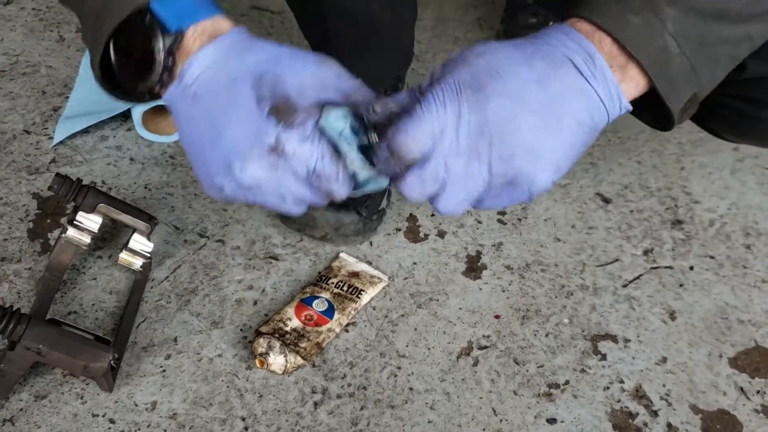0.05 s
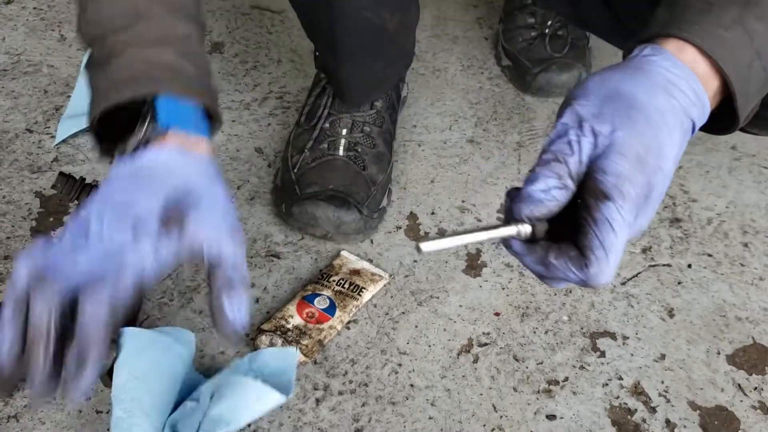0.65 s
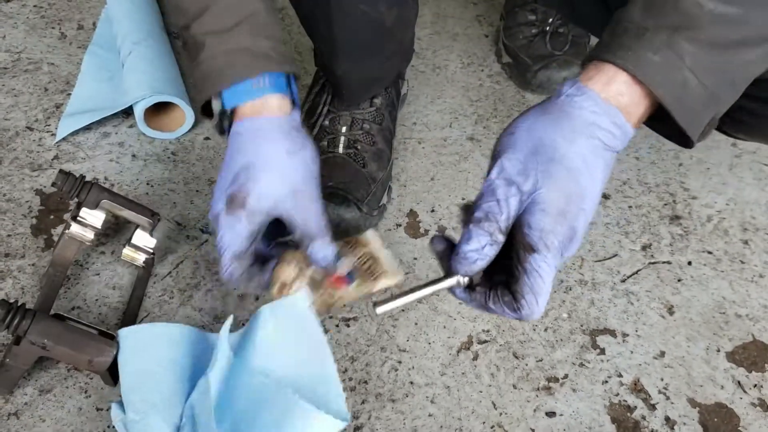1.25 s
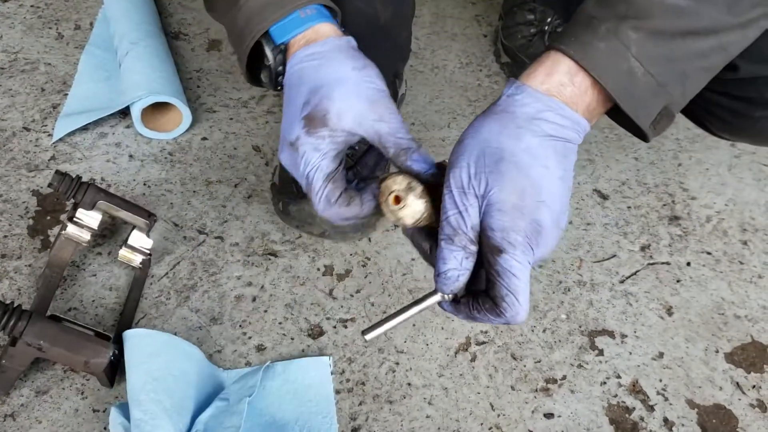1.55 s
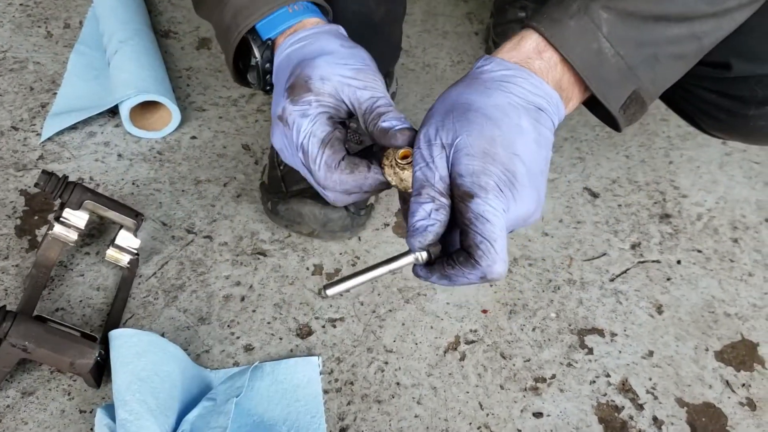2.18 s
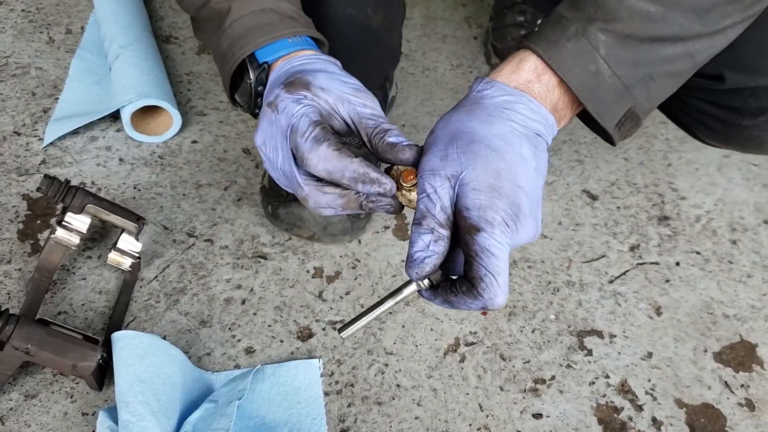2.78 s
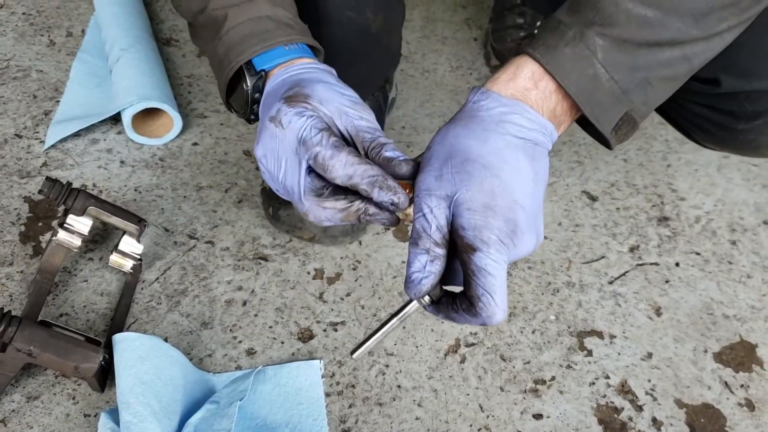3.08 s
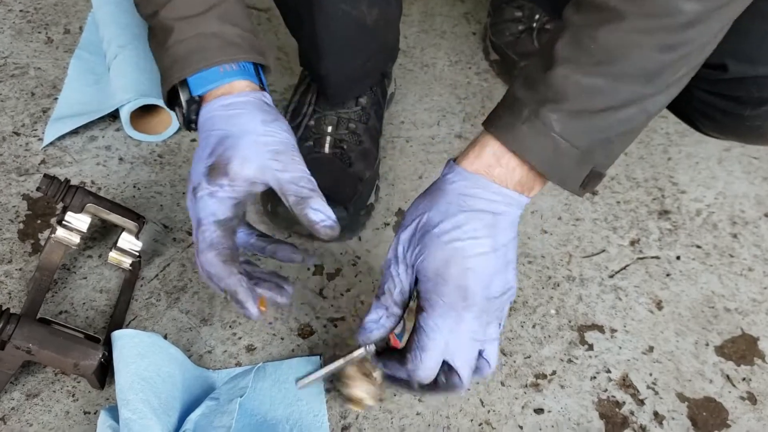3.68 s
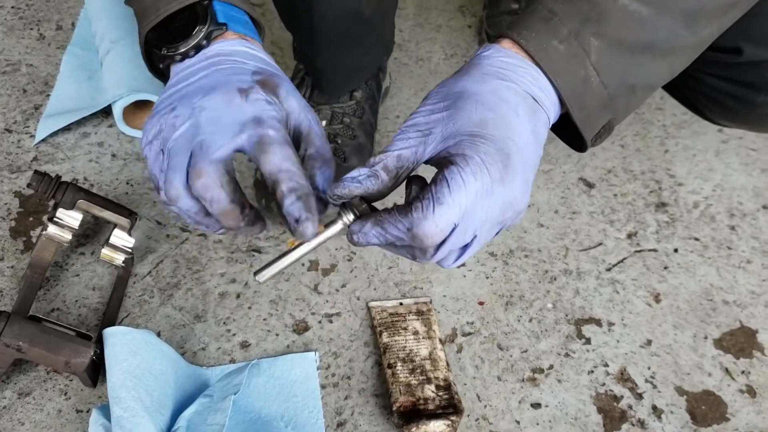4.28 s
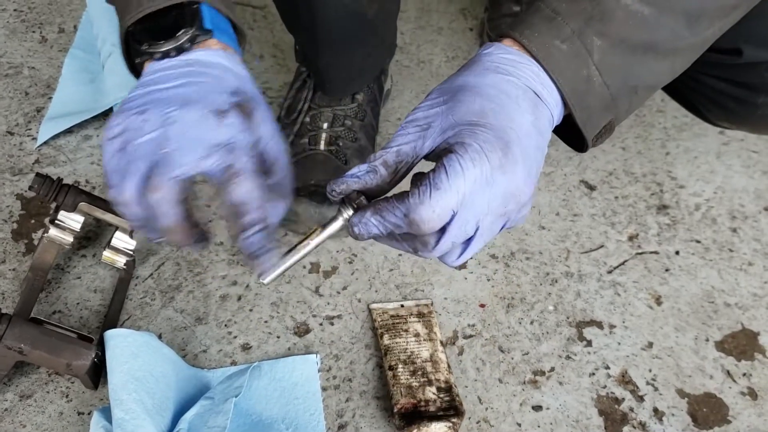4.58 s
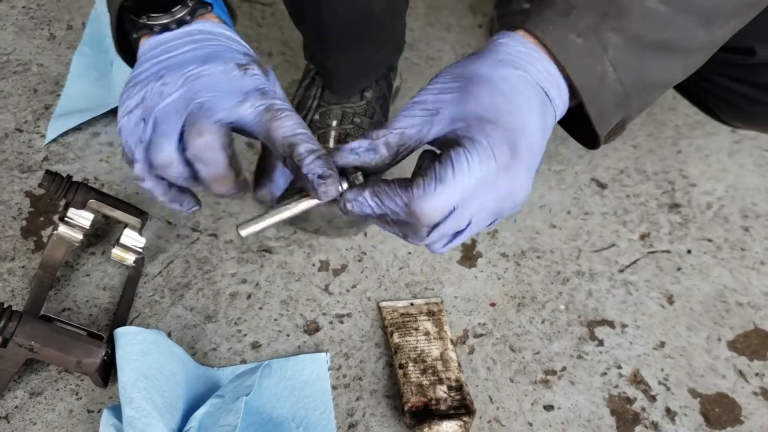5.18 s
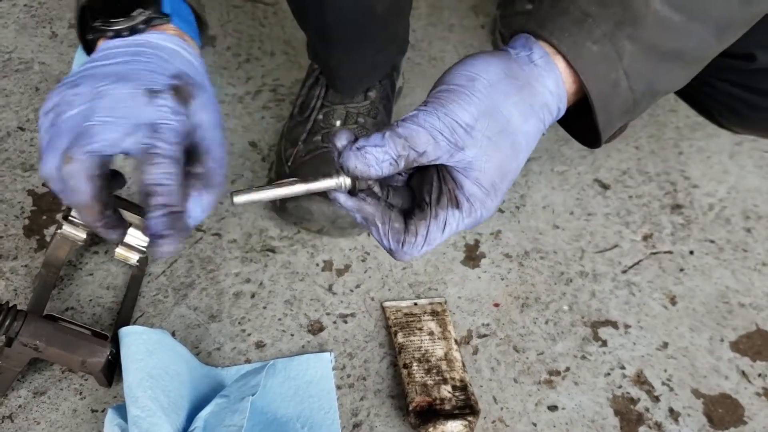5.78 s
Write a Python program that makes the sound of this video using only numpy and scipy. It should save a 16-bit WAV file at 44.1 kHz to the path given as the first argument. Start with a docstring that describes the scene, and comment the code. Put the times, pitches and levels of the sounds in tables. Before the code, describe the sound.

Sleeves, rubber gloves and a paper towel rustle softly from the start, close and slightly to the left, while a motor hums low and steady further off in a garage. A low rumble swells just before 1 second. From about 1 to 1.3 seconds a grease tube is lifted off the concrete floor with a short gritty scrape and three light knocks. Quiet rustling and small crisp flicks continue. The rumble swells again near 3.2 seconds, followed by a stronger sleeve swish. At about 3.7 seconds the tube drops onto the floor with a quick cluster of dull, hollow knocks, hits again sharply near 3.9 seconds, then rocks to rest with fading taps by 4.3 seconds. This is the loudest moment. A few soft rustles follow until about 5.6 seconds over the hum. The stereo microphone is close, with a light room echo.

```python
"""Gloved hands grease a metal brake pin in a garage: sleeves, gloves and a paper towel rustle
from the start, while a motor hums further off. After about a second a grease tube is scraped
up from the concrete floor, and the rustling goes on. Near 3.7 seconds the tube is dropped back,
rings with each knock and rocks to rest; a few soft rustles follow. A low rumble swells before
the lift and the drop. A close stereo microphone hears it all with a light room echo."""
import sys
import numpy as np
from scipy import signal
from scipy.fft import rfft, irfft
from scipy.io import wavfile
from scipy.ndimage import uniform_filter1d

SR = 44100
rng = np.random.default_rng(int(sys.argv[2]) if len(sys.argv) > 2 else 0)


def put_to_file(sound):
    """Save the sound as 16-bit audio at rate SR, in the file named by the first command-line argument."""
    columns = np.atleast_2d(sound).T  # one column per channel
    safe = np.clip(columns, -1, 1)
    whole_steps = np.round(safe * 32767)
    wavfile.write(sys.argv[1], SR, whole_steps.astype(np.int16))


N = 257805
T = np.arange(N) / SR

# The tones a struck tube rings with. Each row: pitch in Hz, seconds to fade by 60 dB, level in dB.
TUBE_TONES = [(307, 0.025, -16), (608, 0.049, -26), (785, 0.02, -12.5), (937, 0.013, -22),
              (1640, 0.0025, -9.5), (2135, 0.016, -16.5), (2700, 0.0049, -14.5), (3640, 0.0036, -4),
              (4270, 0.0093, -11), (6900, 0.005, -18.5), (9350, 0.0054, -15.5), (10770, 0.0075, -18.5),
              (14400, 0.0043, -15)]
# The tube is lifted, lands and rocks. Each row: start in seconds, ring strength in dB, treble limit
# in Hz (higher for a harder hit), bass limit in Hz, pitch factor, crack level in dB, crack pitch in Hz.
TUBE_KNOCKS = [(1.0609, -11, 1470, 455, 0.99, -34, 6000), (1.169, -19, 1800, 200, 1.04, -45, 7000),
               (1.2986, -21.5, 1700, 700, 1.07, -64, 2000), (3.6913, 0, 1250, 484, 1.065, -34, 6260),
               (3.7252, -4, 1330, 460, 1.07, -34, 13500), (3.7275, -5, 850, 252, 0.93, -35, 2430),
               (3.7427, -9, 2200, 1500, 1.09, -56, 2400), (3.762, -24, 2580, 2000, 1, -59, 2400),
               (3.855, -9.5, 2460, 510, 0.98, -37, 3830), (3.857, -7, 665, 240, 0.88, -55, 3000),
               (3.8724, -6.5, 2300, 1100, 1.013, -42, 4970), (3.8754, 0, 15000, 212, 1.006, -22, 5100),
               (3.9425, -22, 900, 520, 0.92, -58, 2000), (3.955, -14, 1950, 2400, 0.96, -66, 2000),
               (3.9752, -15, 6040, 400, 1.01, -30.5, 6950), (3.993, -22.5, 3500, 443, .83, -37.5, 6500),
               (4.0236, -26, 1940, 700, 1.35, -46, 3800), (4.0612, -20.5, 1370, 597, 0.92, -48, 4500),
               (4.1296, -21.5, 1460, 770, 1.12, -52.5, 4240), (4.2406, -25, 1400, 795, 1.1, -58.5, 3800)]
# Sand grains snap under the tube. Each row: start in seconds, level in dB.
GRAIN_SNAPS = [(1.0417, -54), (1.066, -27), (1.171, -44)]
# Short slides as the tube is picked up and as it settles. Each row: fastest moment in seconds,
# level in dB, rise in seconds, fall in seconds, sand level in dB compared with the tube.
TUBE_SLIDES = [(1.044, -48, 0.014, 0.0087, -1.5), (1.057, -33.5, 0.0054, 0.012, -1.5),
               (1.066, -33, 0.0027, 0.0047, -4), (1.092, -37, 0.015, 0.008, -5),
               (1.146, -37, 0.009, 0.0069, -20), (1.16, -35.5, 0.005, 0.0046, -11),
               (1.142, -44, 0.034, 0.028, -3), (1.175, -41.5, 0.0045, 0.0044, -4),
               (3.89, -50.5, 0.0074, 0.032, 3.5), (3.985, -53, 0.015, 0.09, -8)]
# Where the sliding tube rings. Each row: centre in Hz, width in Hz, relative level in dB.
SLIDE_BANDS = [(279, 200, -4), (750, 99, 2.5), (977, 110, 5), (1640, 310, -10), (2420, 250, -10.5),
               (2760, 79, -5.5)]
# The hiss of sand under the tube. Each row: frequency in Hz, relative level in dB.
SAND_COLOUR = [(1500, -18), (3300, -1), (4700, 4), (7000, 4.5), (11000, 1.5), (15500, 0.5)]
# One sleeve swish for each arm movement.
# Each row: fastest moment in seconds, level in dB, rise in seconds, fall in seconds.
SLEEVE_SWISHES = [(0.01, -51, .05, 0.072), (0.225, -63, 0.23, 0.1), (0.48, -55.5, 0.27, 0.18),
                  (0.77, -53, 0.11, 0.13), (1.39, -57.5, 0.11, 0.38), (1.87, -58, 0.24, 0.16),
                  (3.329, -52.5, 0.015, 0.15), (3.56, -44, 0.073, 0.085), (3.64, -46, 0.076, 0.068),
                  (5.37, -60.5, 0.18, 0.13), (5.62, -65, 0.14, 0.054)]
# Crisp flicks of towel and gloves.
# Each row: loudest moment in seconds, level in dB, rise in seconds, centre in Hz.
TOWEL_FLICKS = [(0.01, -60, 0.15, 11500), (0.216, -51.5, 0.03, 11900), (0.72, -58.5, 0.061, 6240),
                (0.793, -62, 0.053, 12700), (1.86, -58, 0.023, 7140), (2.005, -60, 0.038, 8000),
                (2.152, -63.5, 0.024, 8750), (2.594, -58.5, 0.0096, 9450), (2.61, -64, 0.041, 7940),
                (3.329, -53.5, 0.018, 7150), (4.328, -65.5, 0.034, 9300), (4.48, -63, 0.023, 6860),
                (4.927, -63.5, 0.037, 8100), (5.29, -63, 0.079, 8900), (5.393, -62, 0.035, 9500)]
# Faint creep of the gloves, least while the hands hold steady. Each row: time in seconds, level in dB.
GLOVE_CREEP = [(2.2, -65.5), (2.9, -73.5), (4.2, -70.5)]
# The hiss of rubbing cloth and gloves. Each row: frequency in Hz, relative level in dB.
CLOTH_COLOUR = [(150, -4), (400, 11.5), (1000, 11.5), (1400, 2), (1800, 8), (2600, 3.5), (4000, 0.5),
                (7000, 2.5), (11000, -0.5), (15500, -4)]
# Where the moving arm is. Each row: time in seconds, left minus right in dB.
ARM_POSITION = [(0, -2.5), (.9, -2), (1.4, -4.5), (2.1, -3), (4.3, -4.5), (4.9, 0), (5.4, -4)]
# Hollow things near the tube. Each row: pitch in Hz, gain in dB, seconds to fade by 60 dB.
NEARBY_TONES = [(309.6, -53.5, 0.22), (573, -60, 0.39), (853, -56, 0.16), (2020, -73, 0.39),
                (2171, -76, .25)]
# The tone of the garage's echo. Each row: frequency in Hz, gain in dB.
ECHO_COLOUR = [(100, -19), (300, 4.5), (420, -13), (800, -2), (1650, -4), (2300, -2), (4000, -5.5),
               (8000, -8), (15000, -4)]
# How long the echo lasts. Each row: frequency in Hz, seconds to fade by 60 dB.
ECHO_FADE = [(200, 0.64), (1000, 0.51), (2200, 0.98), (4200, 0.47), (15000, 0.52)]
# The motor's hum and its thin whine. Each row: multiple of the running rate, relative level in dB.
MOTOR_HUM = [(1, -10), (2, -0.5), (3, -9.5), (4.22, -12.5), (5, -13), (7, -5), (8, -10.5), (10, -14.5),
             (12, -24)]
MOTOR_WHINE = [(16, -22), (22, -24.5), (24, -26)]
# Air and machine noise in the garage. Each row: frequency in Hz, level in dB per Hz.
AIR_COLOUR = [(22, -102), (45, -65), (90, -69.5), (150, -74.5), (300, -80), (450, -77.5), (580, -81),
              (800, -81), (1300, -91), (1650, -94), (2000, -101), (2450, -99), (3200, -107), (5000, -112.5),
              (7600, -114.5), (9800, -121), (15000, -115)]
# The microphone's two sides differ in tone. Each row: frequency in Hz, left minus right in dB.
MIC_BALANCE = [(200, 0.1), (700, -1), (1300, -7.5), (2400, -5), (4400, -4.5), (8000, 2.5), (13000, 2)]

LEFT_ONLY, OPPOSITE_SIDES = np.array([[1], [0]]), np.array([[1], [-1]])


def tube_knocks():
    """Each blow rings the tube and cracks the grit; a soft hit is duller, and some hits have less bass."""
    free_from_s, held_fade_share = 3.8, 0.79  # the ring dies sooner while the glove touches the tube
    sag_share, sag_s, wall_hz = 0.06, 0.0012, 1200
    rings, cracks = np.zeros((2, 2, N))
    t = T[:SR // 8]
    # a blow tightens the soft wall, so its low tones start sharp and sag
    sag = sag_share * sag_s * (1 - np.exp(-t / sag_s))
    for s, db, treble_hz, bass_hz, bend, crack_db, crack_hz in TUBE_KNOCKS:
        ring = 0
        fade_share = held_fade_share if s < free_from_s else 1
        for hz, fade_s, tone_db in TUBE_TONES:
            lag = 1.43 * min(hz / 4000, 1) * LEFT_ONLY  # high tones reach the left side out of step
            # the soft tube bends between blows, which shifts all its tones
            phase = 2 * np.pi * hz * bend * (t + sag * (hz < wall_hz))
            ring = ring + undb(tone_db - 60 * t / (fade_s * fade_share)) * np.sin(phase - lag)
        ring = ring * (1 - np.exp(-t / 0.00008))  # the push takes a moment to build
        ring = cut(-ring, treble_hz, "lowpass", order=4)
        ring = cut(ring, bass_hz, "highpass", order=3)
        add(rings, s, undb(db) * ring * pan(-0.67))
        add(cracks, s, undb(crack_db) * grit_crack(crack_hz))
    for s, db in GRAIN_SNAPS:
        add(cracks, s, undb(db) * grit_crack(hz=7500))
    return rings, cracks


def grit_crack(hz):
    """A grain of grit gives way: a few milliseconds of noise around hz."""
    t = T[:SR // 8]
    noise = cut(rng.standard_normal((2, len(t))), [hz / 1.53, hz * 1.4], "bandpass", order=1)
    return unit(noise) * np.exp(-t / 0.0027)


def tube_scrape():
    """The tube catches and slips on the concrete; its body rings and sand hisses under it."""
    catches = slips(per_s=1300, spread_db=3)
    body = sum(undb(db) * cut(catches, [hz - width / 2, hz + width / 2], "bandpass", order=1)
               for hz, width, db in SLIDE_BANDS)
    body = unit(cut(body, 2870, "lowpass", order=8))
    grains = np.array([slips(per_s=2600, spread_db=1.7) for _ in range(2)])
    sand = unit(colour(grains + 0.089 * catches, SAND_COLOUR))
    body_power = sand_power = 0
    for s, db, rise, fall, sand_db in TUBE_SLIDES:
        push = undb(db) * swell(s, rise, fall)
        body_power = body_power + push ** 2
        sand_power = sand_power + (push * undb(sand_db)) ** 2
    return body * np.sqrt(body_power) + sand * np.sqrt(sand_power) * pan(0.48)


def rustle():
    """Sleeves hiss as their fibres slip; towel and gloves add crisp, crinkling flicks."""
    fibres = np.array([slips(per_s=9000, spread_db=0.62) for _ in range(2)])
    fibres += 0.14 * slips(per_s=2500, spread_db=3.14)
    sleeve_power = sum((undb(db) * swell(s, rise, fall)) ** 2 for s, db, rise, fall in SLEEVE_SWISHES)
    glove_power = undb(curve(GLOVE_CREEP)) ** 2
    sound = unit(colour(fibres, CLOTH_COLOUR)) * np.sqrt(glove_power + sleeve_power)
    rubbing = np.array([slips(per_s=6000, spread_db=1.4) for _ in range(2)])
    creases = 0.092 * slips(per_s=210, spread_db=2.8)
    crinkle = cut(rubbing + creases, 3200, "highpass")
    for s, db, rise, hz in TOWEL_FLICKS:
        band = cut(crinkle, [hz / 1.42, hz * 1.42], "bandpass", order=1)
        sound = sound + undb(db) * swell(s, rise, fall=1.86 * rise) * unit(band)
    sound = folds(sound)
    stutter = undb(1.2 * wander(per_s=70))  # rubbing sticks and slips
    return sound * stutter * pan(curve(ARM_POSITION))


def folds(x):
    """Folds open and close, so each band of the rustle swells and fades on its own."""
    hz = np.fft.rfftfreq(N, 1 / SR)
    centres = np.geomspace(2000, 15000, 11)
    spectrum = rfft(x)
    bands = (irfft(spectrum * np.interp(hz, centres, share), N) for share in np.eye(len(centres)))
    return sum(band * undb(1.67 * wander(per_s=12)) for band in bands)


def nearby_ringing(x):
    """Things around the tube ring on faintly after a knock."""
    t = T[:SR // 2]
    ring = sum(undb(db - 60 * t / fade_s) * np.sin(2 * np.pi * hz * t) for hz, db, fade_s in NEARBY_TONES)
    return signal.fftconvolve(x.mean(axis=0), ring)[:N]


def garage_echo(x, tail_db, early_db, early_s):
    """Sound bounces off the floor and the worker first, then lingers faintly in the room."""
    t = T[:SR * 3 // 4]
    edges = np.geomspace(100, 18000, 9)
    tail = 0
    for lo, hi in zip(edges, edges[1:]):
        band = cut(rng.standard_normal((2, len(t))), [lo, hi], "bandpass")
        if hi < 400:
            band = band[[0, 0]]  # low sounds reach both sides alike
        tail = tail + band * undb(-60 * t / look_up(ECHO_FADE, np.sqrt(lo * hi)))
    level = undb(tail_db) + undb(early_db) * np.exp(-t / early_s)
    arrival = np.clip(t / 0.0021 - 1, 0, 1)  # the first bounce takes about 2 milliseconds
    return signal.fftconvolve(x, colour(tail, ECHO_COLOUR) * level * arrival, axes=1)[:, :N]


def motor(running_hz, level_db):
    """A motor's tones waver a little, and each reaches the left and right sides out of step."""
    turns = np.cumsum(running_hz * (1 + 0.00066 * wander(per_s=2.025))) / SR
    tones = 0
    for multiple, db in MOTOR_HUM + MOTOR_WHINE:
        lag = rng.choice([-1, 1]) * min(multiple * running_hz / 1800, 1) * OPPOSITE_SIDES
        waver_db = 1.5 * min(multiple / 10 + 0.3, 1) * wander(per_s=7)
        phase = 2 * np.pi * (multiple * turns + rng.random())
        tones = tones + undb(db + waver_db) * np.sin(phase + lag)
    return undb(level_db) * unit(tones)


def low_rumble():
    """A narrow band of bass that swells twice above a steady level."""
    swells = undb(-45) * swell(0.88, rise=0.32, fall=0.46) + undb(-48) * swell(3.2, rise=0.21, fall=0.46)
    bass = unit(cut(rng.standard_normal(N), [74, 99.6], "bandpass"))
    return bass * np.hypot(swells, undb(-56.5))


def garage_air():
    """Noise from all around: long sound waves reach both sides alike, short ones do not."""
    mic_spacing_m = 0.34
    wavelength_m = 343 / np.maximum(np.fft.rfftfreq(N, 1 / SR), 1)
    alike = 0.95 * np.sinc(2 * mic_spacing_m / wavelength_m)
    mid, side = rfft(rng.standard_normal((2, N)))
    noise = irfft(mid * np.sqrt(1 + alike) + OPPOSITE_SIDES * side * np.sqrt(1 - alike), N)
    return colour(noise, AIR_COLOUR) * np.sqrt(SR) / 2 * undb(0.5 * wander(per_s=2.37))


def slips(per_s, spread_db):
    """Tiny slips: clicks at random moments and of uneven size."""
    happens = rng.random(N) < per_s / SR
    return unit(happens * rng.standard_normal(N) * undb(spread_db * rng.standard_normal(N)))


def swell(s, rise, fall):
    """A smooth hump that grows to 1 at time s and dies away."""
    away = ((T - s) / np.where(T < s, rise, fall)) ** 2
    return np.exp(-np.minimum(away, 40))


def wander(per_s):
    """A smooth random drift with a typical size of 1."""
    size = int(SR / per_s)
    steps = np.repeat(rng.standard_normal(N // size + 1), size)
    return unit(uniform_filter1d(steps, size)[:N])


def undb(db):
    """Turn decibels into a number to multiply by."""
    return 10 ** (np.asarray(db) / 20)


def unit(x):
    """Scale to an average (rms) level of 1."""
    return x / np.sqrt(np.mean(x ** 2))


def curve(rows):
    """Read a table of times and values at every sample."""
    return np.interp(T, *np.transpose(rows))


def look_up(rows, hz):
    """Read a table of frequencies and values, giving each octave equal room."""
    row_hz, values = np.transpose(rows)
    return np.interp(np.log(np.maximum(hz, 1)), np.log(row_hz), values)


def colour(x, rows, power=1):
    """Turn each frequency up or down by a table of Hz and dB."""
    hz = np.fft.rfftfreq(x.shape[-1], 1 / SR)
    return irfft(rfft(x) * undb(look_up(rows, hz)) ** power, x.shape[-1])


def cut(x, hz, kind, order=2):
    """Keep the lows, the highs or a band; a higher order cuts more steeply."""
    sections = signal.butter(order, np.minimum(hz, SR / 2 - 100), kind, fs=SR, output="sos")
    return signal.sosfilt(sections, x)


def pan(db):
    """Left and right gains that make the left side louder by db."""
    return undb(OPPOSITE_SIDES * db / 2)


def add(track, s, sound):
    """Mix a short sound into a track at time s."""
    start = int(s * SR)
    track[:, start:start + sound.shape[-1]] += sound


def scene():
    """The tube with its echo and the rustling hands, over the motor and the background noise."""
    rings, cracks = tube_knocks()
    scrape = tube_scrape()
    # the tube's high tones beam upwards; its low tones, cracks and scrapes spread through the room
    spread = cut(rings, 1450, "lowpass") + undb(6.5) * cracks + undb(2.5) * scrape
    echo = garage_echo(spread, tail_db=-42, early_db=-36, early_s=0.027)
    handling = rings + cracks + scrape + echo + nearby_ringing(rings) + rustle()
    return handling + motor(running_hz=102.5, level_db=-47.5) + garage_air() + low_rumble()


def record(dry):
    """The microphone gives each side its own tone, rounds off loud peaks and cuts the highest treble."""
    peak_limit, top_hz = 0.8, 16000
    heard = colour(dry, MIC_BALANCE, power=OPPOSITE_SIDES / 2)
    heard = peak_limit * np.tanh(heard / peak_limit)
    return signal.sosfilt(signal.ellip(10, 0.1, 80, top_hz, fs=SR, output="sos"), heard)


dry = scene()
out = record(dry)
put_to_file(out)
```